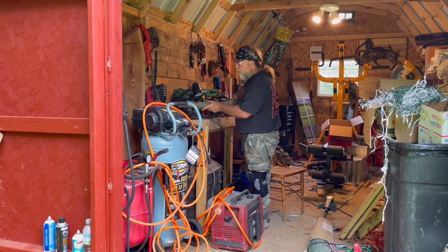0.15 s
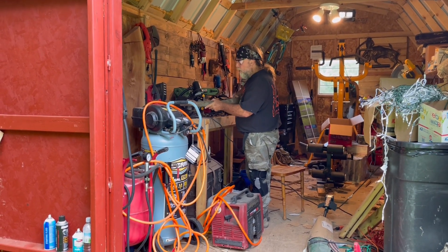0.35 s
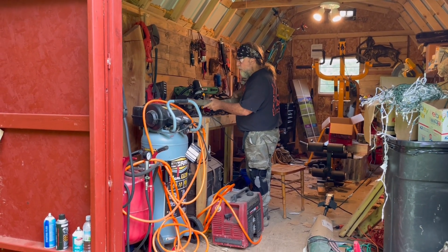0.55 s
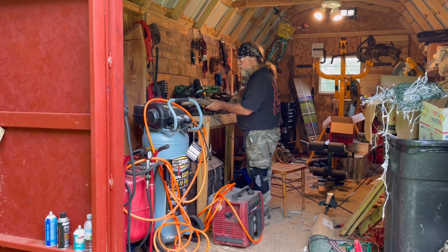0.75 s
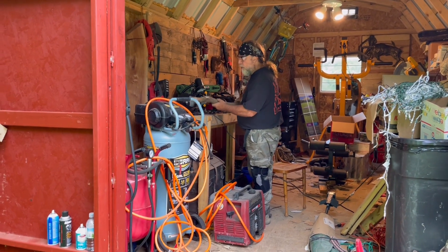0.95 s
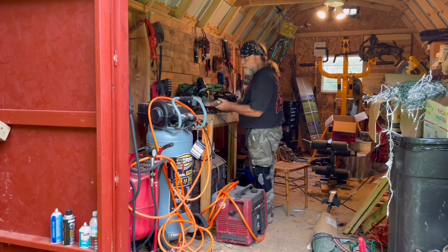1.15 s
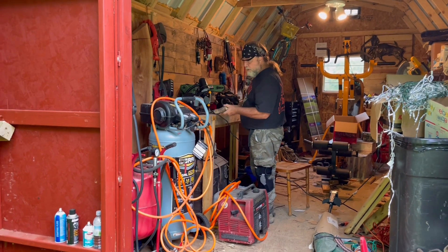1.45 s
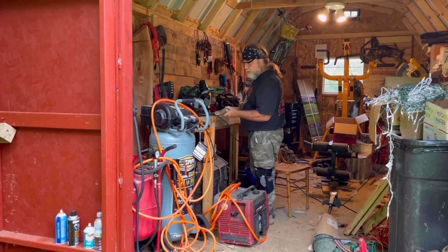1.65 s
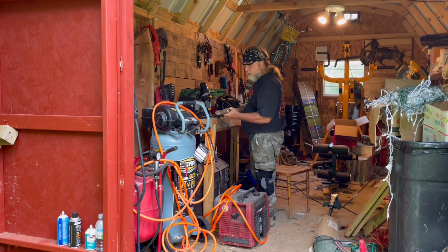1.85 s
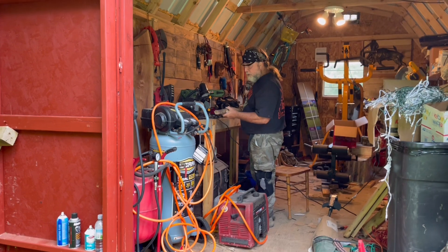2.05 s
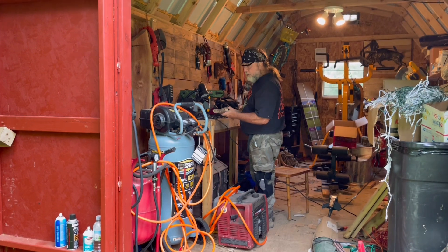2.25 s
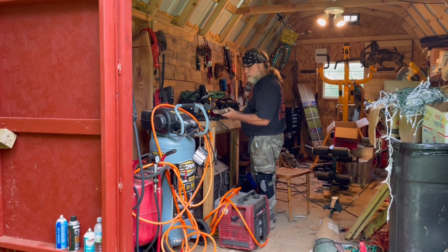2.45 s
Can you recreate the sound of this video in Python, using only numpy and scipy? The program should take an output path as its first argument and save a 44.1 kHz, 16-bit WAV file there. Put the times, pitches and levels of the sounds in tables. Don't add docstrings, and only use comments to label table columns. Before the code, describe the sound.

Power sander laboring and scraping on wood for a second, then running unloaded in a shed

```python
import sys
import numpy as np
from scipy import signal
from scipy.fft import rfft, irfft, next_fast_len
from scipy.io import wavfile
from scipy.ndimage import uniform_filter1d

SR = 44100
rng = np.random.default_rng(int(sys.argv[2]) if len(sys.argv) > 2 else 0)


def gain_from_db(level_db):
    decades = np.asarray(level_db, float) / 20
    return 10 ** decades


def generate_wav(signal):
    frames = np.transpose(np.atleast_2d(signal))
    scaled = np.clip(frames, -1, 1) * 32767
    pcm = np.round(scaled).astype(np.int16)
    wavfile.write(sys.argv[1], SR, pcm)


N = 114660
T = np.arange(N) / SR

# time in seconds, load from 0 to 1, strain in dB.
MOTOR = [
    (0, 0.95, -4.5),
    (.14, 0.89, -1),
    (.3, 0.83, 1.5),
    (.45, 0.9, -0.5),
    (.68, 0.96, 0.5),
    (.79, 0.85, 1.5),
    (.86, 0.63, -0.5),
    (.95, 0.22, -7),
    (1.05, 0.06, -11.5),
]
# time in seconds, pressure in dB, brightness in dB per octave.
PRESS = [
    (0, -6, -0.5),
    (.3, -5.5, 0.2),
    (.5, -6.5, -0.5),
    (.66, -4.5, -1.3),
    (.74, -3.5, -4),
    (.87, -7, -4.5),
]


def evened(x):
    return x / np.sqrt(np.mean(x ** 2) + 1e-20)


def column(table, at, index=1, log=False):
    rows = np.array(table, float)
    if log:
        return np.interp(np.log(at + 1), np.log(rows[:, 0] + 1), rows[:, index])
    return np.interp(at, rows[:, 0], rows[:, index])


def wander(top_hz):
    hz = np.geomspace(0.5, top_hz, 16)[:, None]
    t = T[::64]
    waves = np.sin(2 * np.pi * (hz * t + rng.random((16, 1)))) / hz ** 0.17
    return np.interp(T, t, evened(waves.sum(0)))


def noise(field_db):
    hz = np.fft.rfftfreq(1024, 1 / SR)[:, None]
    t = np.arange(N // 256 + 5) * 256 / SR
    a, b, p = rng.standard_normal((len(t), 513, 3)).T
    patches = evened(uniform_filter1d(uniform_filter1d(p, size=9, axis=0), size=7, axis=1))
    flat = a + 1j * b
    white = np.std(signal.istft(flat, nperseg=1024, noverlap=768)[1])
    x = signal.istft(flat * gain_from_db(field_db(hz, t, patches)), nperseg=1024, noverlap=768)[1]
    return x[:N] / white * np.sqrt(SR / 2)


def lift(peaks, hz, shares):
    return sum(share * db / (1 + (2 * (hz - f) / width) ** 2)
               for (f, width, db), share in zip(peaks, shares))


def hum(partials, turns, level_db, strain_db, wander_db, slip, smear, lag, held, held_lag, scramble_above):
    shared = wander(14.0)
    total = np.zeros(N)
    for k, db in partials:
        strain = strain_db * (min(k, 8) / 5 if k <= 10 else 0.5)
        level = level_db + db + strain + wander_db * np.sqrt(k) * wander(12.0)
        delay = lag + held_lag * (k in held) + smear * k * k
        walls = (k > scramble_above) * rng.normal() * k / 5
        waver = slip * (k * shared / 2 + max(np.sqrt(k), k / 2 - 3) * wander(13.0))
        total += np.sqrt(2) * gain_from_db(level) * np.cos(2 * np.pi * k * turns - delay + walls + waver)
    return total


def loaded_drone(turns):
    # shaft multiple, level in dB.
    loaded = [(1, -31), (2, -6.5), (3, -17), (4, 2), (5, -30), (6, -4), (7, -21), (8, -5), (9, -33.5),
              (10, -7.5), (11, -11), (12, -13.5), (13, -14.5), (14, -10), (15, -34), (16, -25.5),
              (17, -22.5), (18, -17.5), (19, -15), (20, -16.5), (21, -21.5), (22, -18), (23, -17),
              (24, -25), (25, -13.5), (26, -20.5), (27, -39.5), (28, -43), (29, -49.5), (30, -53)]
    behind_turns = 0.183
    return hum(loaded, turns - behind_turns, level_db=-26, strain_db=column(MOTOR, T, index=2),
               wander_db=0.7, slip=0.085, smear=-0.04, lag=-0.65,
               held=(2, 8, 12, 14), held_lag=1.1, scramble_above=14)


def free_drone(turns):
    # shaft multiple, level in dB.
    free = [(1, -14), (2, -2), (3, 2), (4, -11.5), (5, -6), (6, -9.5), (7, -36), (8, -12.5), (9, -47),
            (10, -13.5), (11, -19), (12, -17.5), (13, -14), (14, -10), (15, -25.5), (16, -21), (17, -15.5),
            (18, -19), (19, -22.5), (20, -32.5), (21, -26.5), (22, -20.5), (23, -19.5), (24, -19.5),
            (25, -31), (26, -17.5), (27, -40), (28, -30), (29, -48), (30, -40.5)]
    # shaft multiple, level in dB.
    whine = [(34, -36), (36, -36.5), (37, -24.5), (38, -46), (40, -28.5), (42, -35), (44, -28.5), (52, -42)]
    return hum(free + whine, turns, level_db=-28, strain_db=0,
               wander_db=0.3, slip=0.025, smear=0.26, lag=2.1,
               held=(1, 4), held_lag=1.6, scramble_above=10)


def belt_flap(turns):
    phase, width_hz = 2 * np.pi * 2.52 * turns, 3.8
    return gain_from_db(-39.5) * (wander(width_hz) * np.cos(phase) + wander(width_hz) * np.sin(phase))


def fan_air(turns):
    # frequency in Hz, level in dB per Hz.
    air = [(35, -78.5), (70, -56.5), (400, -69.5), (800, -77), (1500, -79.5), (2500, -84.5), (5300, -98),
           (15500, -114)]
    # frequency in Hz, width in Hz, lift in dB.
    housing = [(386, 13, 7.5), (680, 130, 4), (1160, 350, 5.5), (1343, 170, 2), (3800, 480, 2),
               (4740, 140, 4)]

    def field(hz, t, patches):
        return column(air, hz, log=True) + lift(housing, hz, np.ones(len(housing))) + 0.59 * patches

    beats = np.cos(4 * np.pi * turns) + 0.24 * np.cos(6 * np.pi * turns + 4.5) + 0.5 * np.cos(2 * np.pi * turns)
    return noise(field) * (1 + 0.15 * beats)


def machine(turns, load):
    free = free_drone(turns) + belt_flap(turns)
    return (1 - load ** 1.25) * free + load * loaded_drone(turns) + fan_air(turns)


def pressure(t):
    # start in seconds, hold in seconds, extra pressure in dB.
    strokes = [
        (0.079, 0.19, 7),
        (0.276, 0.018, 2),
        (0.36, 0.038, 4),
        (0.485, 0.053, 2.5),
        (0.56, 0.031, 5),
        (0.601, 0.0071, 5),
        (0.646, 0.0083, 3),
    ]
    push_s, ease_s = 0.006, 0.029
    total = column(PRESS, t)
    for start, hold, db in strokes:
        bite = np.clip((t - start) / push_s, 0, 1)
        ease = np.clip(1 - (t - start - hold) / ease_s, 0, 1)
        total = total + db * bite * ease
    return total


def scrape(turns, load):
    # frequency in Hz, level in dB per Hz.
    grit = [(45, -76.5), (150, -58), (700, -59.5), (2300, -66.5), (3000, -72), (6300, -79), (10700, -82),
            (15500, -103)]
    # frequency in Hz, width in Hz, lift in dB.
    wood = [(989, 30, 4.5), (1200, 72, 8), (1351, 45, 5.5), (1770, 214, 9.5), (2040, 60, 6),
            (2337, 70, 6.5), (2700, 76, 2), (3450, 80, 5), (3780, 110, 7.5), (4050, 90, 6), (4500, 110, 6),
            (5050, 90, 6), (10800, 710, 1)]
    slide = [1., -1.1, 1., -.9, 2., -1., -0.41, 2., -1., .3, .7, 0., 0]

    def field(hz, t, patches):
        press = pressure(t)
        follows = 0.18 + (1 - 0.18) / (1 + (570.0 / (hz + 1)) ** 4)
        shares = [np.maximum(1 + drift * (np.minimum(t, 0.8) - 0.4) + 0.2 * np.interp(t, T, wander(8.0)), 0)
                  for drift in slide]
        ring = lift(wood, hz, shares) * np.clip(1 + 0.45 * press / 10, 0, 2)
        tilt = column(PRESS, t, index=2) * np.log2(np.maximum(hz / 1070.0, 1))
        return column(grit, hz, log=True) + follows * press + ring + tilt + 2.5 * patches

    drum = np.cos(8 * np.pi * turns) + 1.43 * np.cos(4 * np.pi * turns)
    depth = 0.11 * gain_from_db(0.4 * pressure(T) - 3.5)
    chatter = 1 + depth * drum + 0.16 * wander(160.0)
    return noise(field) * chatter * load


def catches():
    # time in seconds, level in dB, ring frequency in Hz.
    ticks = [(0.0842, -38.5, 1680), (0.1072, -26.5, 1780), (0.146, -42, 1820), (.1935, -40.5, 1700),
             (0.213, -38, 1270), (.245, -38.5, 2270), (0.26, -35, 1780), (0.3605, -39.5, 2600),
             (0.383, -46, 1270), (.4938, -49, 4000), (.5202, -40, 1900), (0.5607, -35.5, 1720),
             (0.561, -44.5, 4620), (0.578, -27, 1800), (.5891, -51, 1370), (0.598, -34.5, 1790),
             (.618, -42, 4000), (.647, -42.5, 4550), (.7183, -51.5, 1990), (.9782, -60, 1880),
             (1.013, -48, 810)]
    t60_s, crack_s = 0.035, 0.003
    x = np.zeros(N)
    t = T[:900]
    for start, db, hz in ticks:
        ring = np.sqrt(2) * gain_from_db(-60 * t / t60_s) * np.sin(2 * np.pi * hz * t)
        crack = 0.4 * np.exp(-t / crack_s) * rng.standard_normal(900)
        x[round(start * SR):][:900] += gain_from_db(db) * (ring + crack)
    return x


def birds():
    # start in seconds, length in seconds, first and last frequency in Hz, level in dB.
    whistles = [(1.415, 0.026, 2500, 2800, -56), (1.496, .075, 3390, 3374, -55),
                (1.823, 0.035, 2700, 2768, -53), (1.845, .04, 3190, 2850, -51),
                (1.898, 0.027, 3150, 3440, -57), (1.91, 0.033, 3465, 3430, -47),
                (1.947, .04, 3350, 3450, -52.5), (1.988, 0.044, 3330, 3300, -60),
                (1.927, 0.053, 2470, 2670, -49), (1.994, 0.037, 2750, 2270, -49.5),
                (2.031, 0.033, 2300, 2190, -54), (2.25, 0.022, 2750, 2820, -53),
                (2.315, .03, 3160, 3390, -53.5), (2.333, .035, 3460, 3440, -52),
                (2.363, .05, 3416, 3360, -55), (2.377, 0.032, 2960, 3310, -50),
                (2.433, .07, 2690, 2390, -50), (2.522, .04, 2630, 2370, -50)]
    x = np.zeros(N)
    for start, length, from_hz, to_hz, db in whistles:
        u = np.clip((T - start) / length, 0, 1)
        hz = from_hz + (to_hz - from_hz) * u + 15 * wander(40.0)
        swell = np.sin(np.pi * u) ** 0.88
        x += np.sqrt(2) * gain_from_db(db) * swell * np.sin(2 * np.pi * np.cumsum(hz) / SR)
    return x + 0.24 * np.roll(x, 700) + 0.27 * np.roll(x, 1500)


def shed(x):
    t60_s = 0.09
    tail = rng.standard_normal(9000) * gain_from_db(-60 * T[:9000] / t60_s)
    return signal.oaconvolve(x, tail / np.linalg.norm(tail))[:N]


def scene():
    # time in seconds, turns per second.
    speed = [(0.0, 29.3), (0.16, 29.1), (0.29, 29.2), (0.48, 29.0), (0.57, 29.0), (0.71, 29.3), (0.8, 29.7),
             (0.88, 29.9), (1.06, 29.7), (1.36, 29.8), (2.53, 29.8), (2.6, 29.9)]
    turns = np.cumsum(column(speed, T)) / SR
    load = np.clip(column(MOTOR, T), 0, 1)
    x = machine(turns, load) + scrape(turns, load) + catches() + birds()
    return np.array([x, shed(x)])


def roll_off(x):
    return signal.sosfilt(signal.butter(12, 15750, fs=SR, output="sos"), x)


def record(dry):
    # frequency in Hz, radians the left leads, left-right level in dB, likeness from 0 to 1.
    ports = [(60, 0, -2.9, .9995), (500, -.05, -2.8, .95), (1600, 0, -3, .82), (3000, 1., 1.5, .55),
             (5100, .7, 4.5, .55), (8300, -np.pi, 0, .5), (11400, -2 * np.pi, 0, .6),
             (12000, -2 * np.pi, 0, .6), (14800, -3 * np.pi, 0, .5)]
    edge_hz, low_cut_hz = 15750, 18
    size = next_fast_len(N + 8192)
    hz = np.fft.rfftfreq(size, 1 / SR)
    near, scatter = rfft(np.pad(dry, ((0, 0), (2048, 2048)), "reflect"), size, axis=1)
    high = np.clip((hz - 5300) / 1500, 0, 1)
    phase = column(ports, hz, log=True)
    phase = phase - high * np.sin(2 * phase) / 2
    same = 1 - (1 - column(ports, hz, index=3, log=True)) * (1 - high * np.cos(phase) ** 4)
    turn = np.exp(0.5j * phase) * gain_from_db((1 - high) * column(ports, hz, index=2, log=True) / 2)
    common = np.sqrt((1 + same) / 2) * near
    apart = np.sqrt(abs(1 - same) / 2) * scatter
    band = (hz < edge_hz) / (1 + (low_cut_hz / (hz + 1)) ** 4)
    pair = np.array([(common + apart) * turn, (common - apart) / turn]) * band
    return roll_off(irfft(pair, size, axis=1)[:, 2048:N + 2048])


dry = scene()
out = record(dry)
generate_wav(out)
```